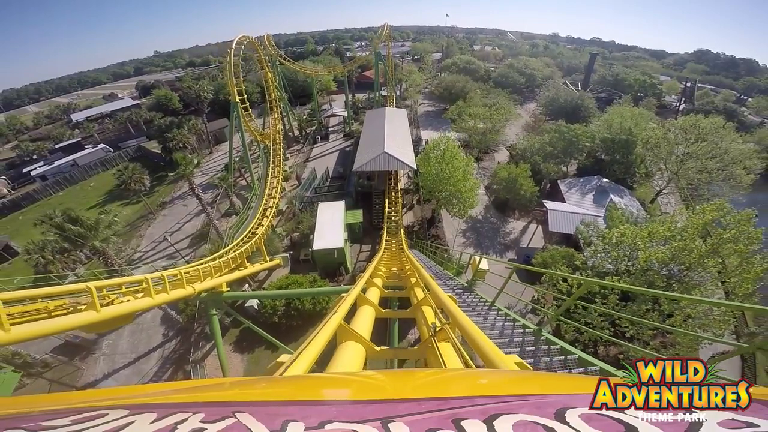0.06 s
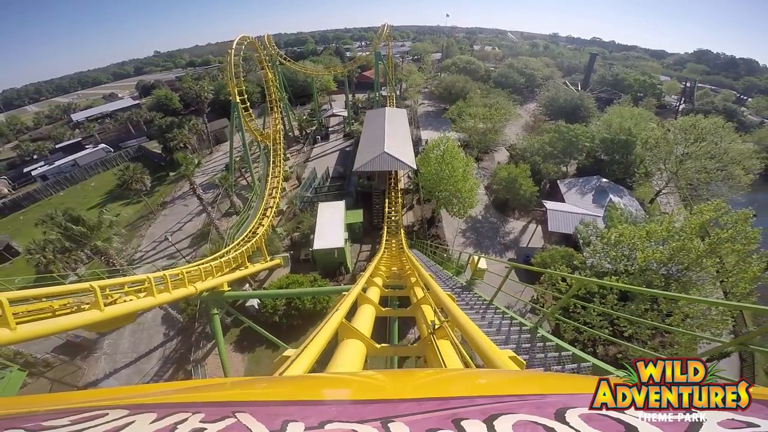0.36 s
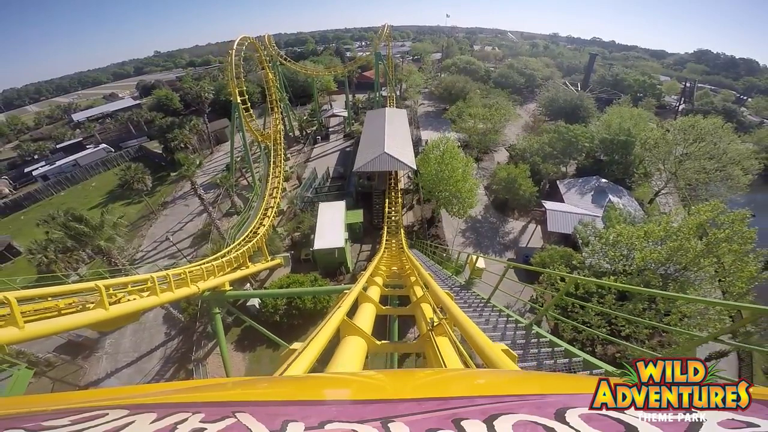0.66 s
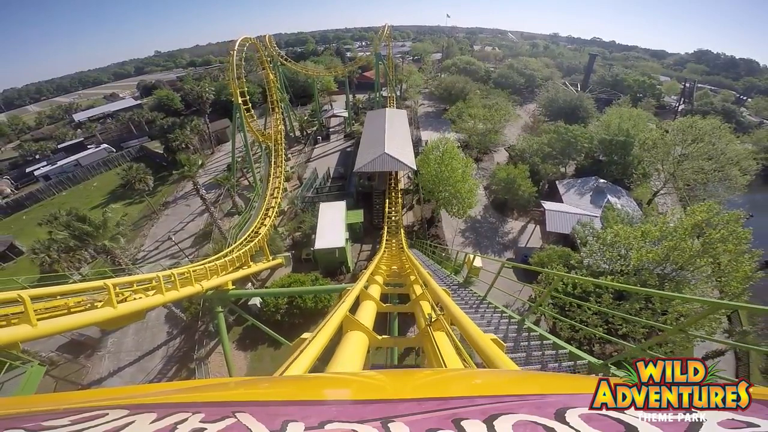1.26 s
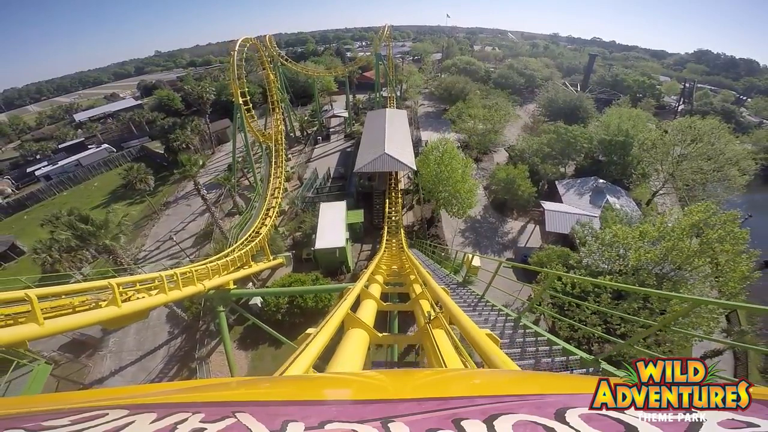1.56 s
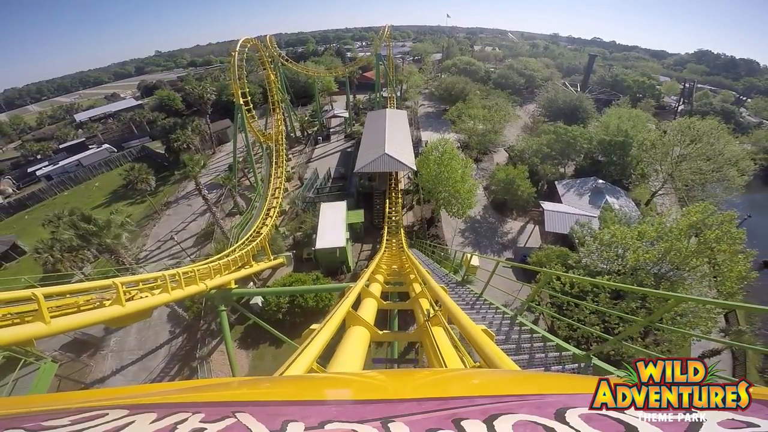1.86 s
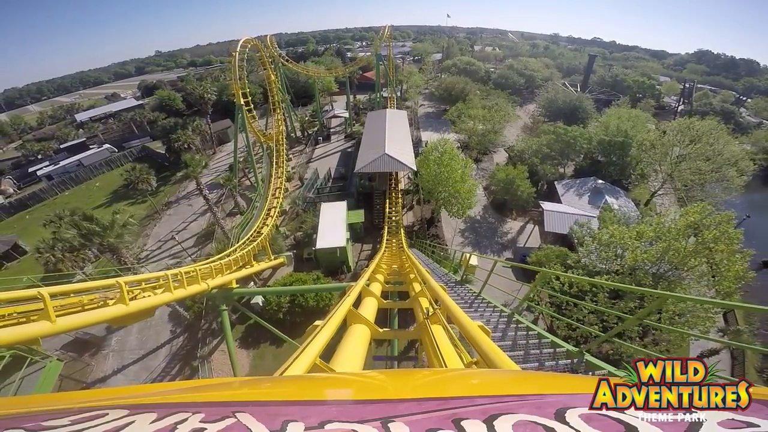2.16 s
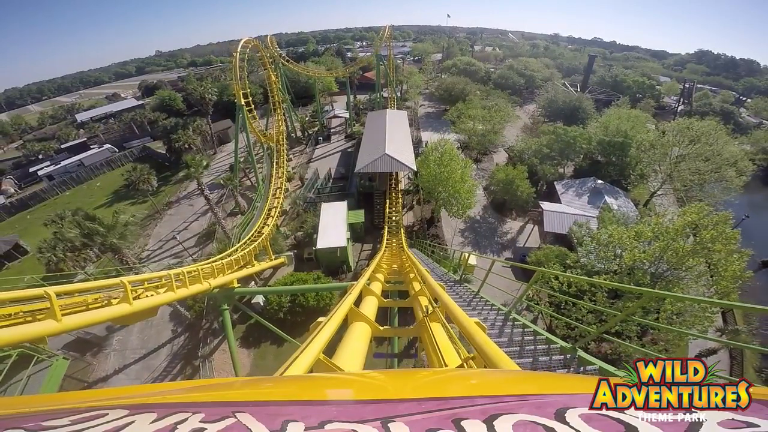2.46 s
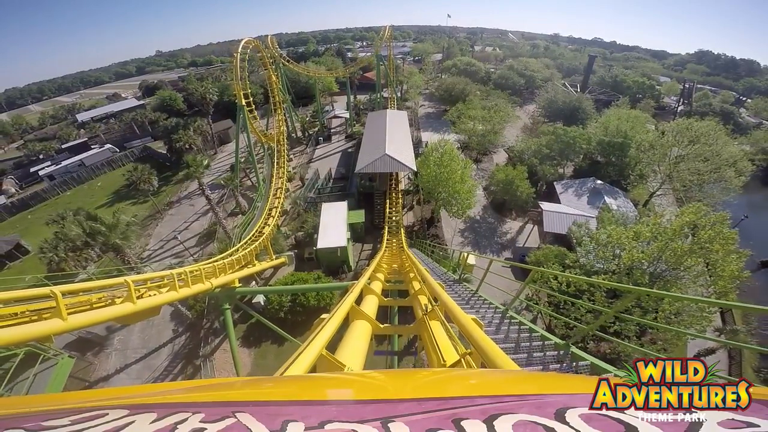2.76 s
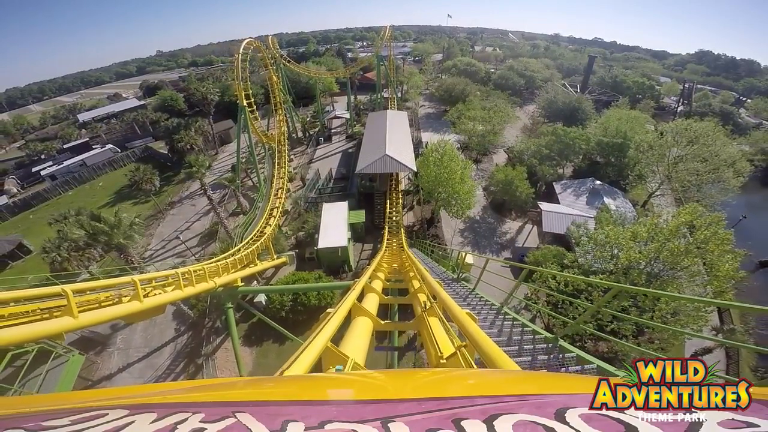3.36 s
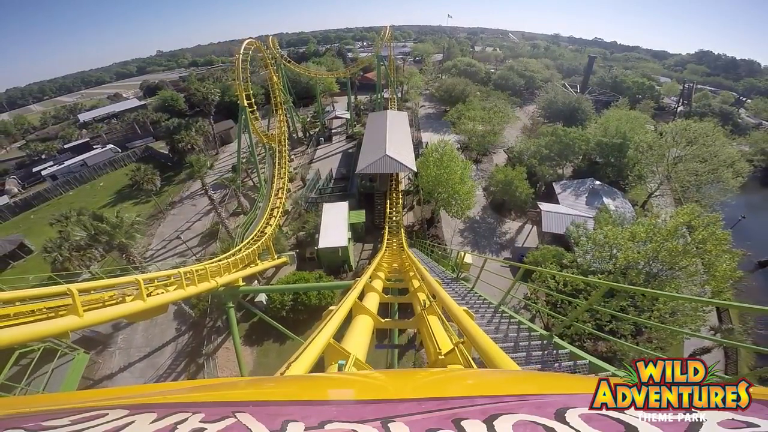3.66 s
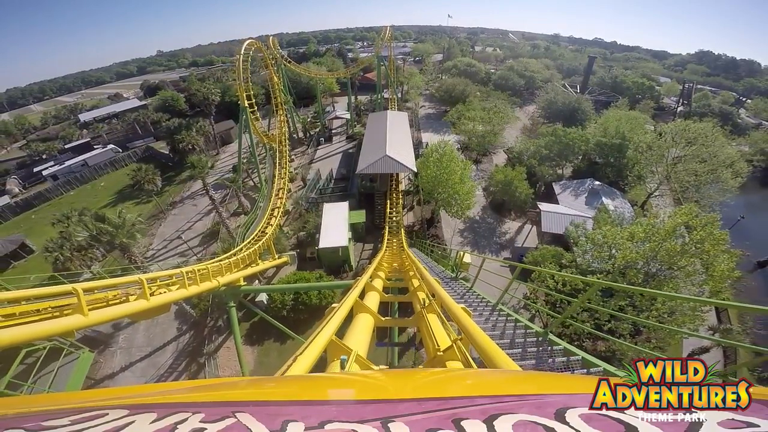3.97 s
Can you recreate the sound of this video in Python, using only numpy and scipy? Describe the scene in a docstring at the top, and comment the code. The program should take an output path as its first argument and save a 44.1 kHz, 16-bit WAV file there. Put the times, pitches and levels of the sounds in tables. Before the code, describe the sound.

A roller coaster car climbs the lift with a deep, shuddering rumble that swells and dips unevenly for the whole four seconds. Beneath it run a faint steady motor whine, light wind hiss and soft chain knocks, about ten a second. A wheel squeaks very faintly near 0.1 and 0.7 seconds, the hiss swells slightly around 0.4 seconds, and a brief faint tone falls at about one second.

```python
"""Roller coaster lift hill, front car, train creeping up.
The car shudders at its lowest resonance; its panels boom and drone as the wheels roll.
The lift drive whines on one steady pitch, beside faint wavering tones, over rolling and wind hiss.
Chain links seat with soft, evenly spaced knocks. A wheel squeaks faintly twice; one short tone falls."""
import sys
import numpy as np
from scipy import signal
from scipy.fft import rfft, irfft
from scipy.io import wavfile
from scipy.ndimage import uniform_filter1d

SR = 44100
rng = np.random.default_rng(int(sys.argv[2]) if len(sys.argv) > 2 else 0)


def dump_mix(stems):
    """Bounce the given channels to the path in sys.argv[1] as a 16-bit WAV at rate SR."""
    frames = np.atleast_2d(stems).T  # one column per channel
    limited = np.clip(frames, -1, 1)  # hard clip at full scale
    pcm = np.round(limited * 32767).astype(np.int16)
    wavfile.write(sys.argv[1], SR, pcm)


N = 176400
T = np.arange(N) / SR

# lowest car resonance, swelling and stalling: t/s, relative level/dB
SHUDDER_DB = [(0.02, -19.5), (0.06, -23.5), (0.15, -16), (0.29, -21), (0.33, -33.5), (0.49, -22.5),
              (0.6, -35), (0.71, -22), (0.76, -33.5), (0.8, -23), (0.88, -18.5), (0.96, -31), (1.18, -17),
              (1.31, -20.5), (1.38, -40), (1.5, -16), (1.56, -18.5), (1.6, -26), (1.7, -16), (1.75, -27),
              (1.81, -17.5), (1.91, -36), (1.95, -21), (2.04, -27.5), (2.15, -21), (2.57, -26.5),
              (2.59, -34), (2.7, -19.5), (2.81, -33), (2.88, -18.5), (3.04, -35.5), (3.11, -26.5),
              (3.73, -24), (3.86, -19), (3.95, -23.5), (3.98, -35.5)]
# its pitch: t/s, f/Hz
SHUDDER_HZ = [(0.02, 35), (0.05, 32.5), (0.13, 31.74), (1.34, 31.63), (1.44, 33.07), (2.79, 32.96),
              (2.96, 34.3), (3.04, 37.7), (3.07, 36.8), (3.98, 37.0)]
# panel boom: t/s, relative level/dB
BOOM_DB = [(0.02, -27), (0.25, -33.5), (0.27, -37), (0.66, -24), (0.72, -28.5), (1.83, -34), (1.94, -33.5),
           (2.02, -37.5), (2.07, -27), (2.17, -37.5), (2.25, -30), (2.28, -39.5), (2.42, -30), (2.75, -38),
           (3.56, -29.5), (3.69, -38), (3.75, -27.5), (3.98, -37)]
# panel drone: t/s, lower relative level/dB, upper relative level/dB
DRONE_DB = [(0.02, -37.5, -35.5), (0.2, -55, -42), (0.23, -31, -38), (0.37, -41.5, -42.5), (0.48, -40, -38),
            (0.52, -37, -43), (0.85, -46, -35.5), (0.96, -41, -47), (0.99, -43, -36), (1.17, -49.5, -44),
            (1.51, -36, -42), (2.21, -43, -41.5), (2.66, -40, -48.5), (2.7, -44, -35), (2.74, -52, -51.5),
            (2.85, -41.5, -43), (3.91, -43.5, -44), (3.98, -40, -45)]
# panel resonances, three sets: f/Hz, width/Hz, relative level/dB
BOOM_MODES = [(50.2, 14, -3), (63.46, 7.7, 3), (87.4, 5.9, -7)]
LOWER_DRONE_MODES = [(111.9, 5.5, -2), (135.9, 11.5, 0)]
UPPER_DRONE_MODES = [(153, 10.6, 0.5), (167, 14.2, -1.5), (203, 11, -12.5), (229.8, 3.7, -16.5)]

# strong drive partials: order, trim/dB
STRONG_ORDERS = [(2, 2), (4, 4.1), (6, 3.5), (7, 4.4), (10, -0.1)]
# their fades, before trim: t/s, level/dB for each order in the name
ORDERS_2_4_6_DB = [(0.05, -75, -66, -73), (0.41, -70, -59, -68), (0.43, -73, -59.5, -64),
                   (0.54, -68, -62, -75), (0.64, -79, -59, -70), (0.76, -68, -59, -71),
                   (1.27, -68.5, -61, -68.5), (1.59, -63.5, -59.5, -64.5), (1.7, -65, -59.5, -70),
                   (2.31, -64, -57.5, -65.5), (3.37, -74, -61.5, -78), (3.66, -62, -63.5, -74),
                   (3.75, -71, -65, -81), (3.95, -68, -64.5, -68)]
ORDER_7_DB = [(0.05, -67), (0.08, -62.5), (0.33, -73), (1.1, -65.5), (1.12, -70), (2.41, -70.5),
              (2.47, -76), (2.59, -67.5), (2.79, -79), (3.09, -63), (3.23, -69.5), (3.71, -65.5),
              (3.83, -62.5), (3.95, -66)]
ORDER_10_DB = [(0.05, -74), (0.24, -65), (0.54, -62.5), (0.58, -70.5), (1.74, -60.5), (1.78, -75),
               (1.87, -59), (2.46, -60.5), (2.56, -55), (2.61, -62.5), (3.08, -58.5), (3.15, -65),
               (3.79, -69), (3.86, -57), (3.89, -70), (3.95, -64)]
# weak drive partials: order, level/dB
WEAK_ORDERS = [(3, -70), (5, -77), (8, -70), (9, -76), (11, -77), (12, -79), (13, -72), (14, -78),
               (15, -83), (16, -81), (17, -82), (18, -84), (19, -86), (20, -86)]
# tones beside the whine: f/Hz, width/Hz, relative level/dB
SIDE_TONES = [(459, 3, -1), (629, 4, -2), (689, 2, 0), (863, 2, 0), (2296, 2, -3)]

# rolling and wind spectrum: f/Hz, relative density/dB
HISS_SPECTRUM = [(200, 3), (300, -2), (450, -4), (700, -7), (1100, -6.5), (1400, -8), (1750, -7.5),
                 (2000, -11), (2400, -7), (3050, -13.5), (4200, -14.5), (4750, -15.5), (5300, -22.5),
                 (6900, -23), (8000, -27), (11000, -30.5), (13000, -30), (14500, -30.5)]
# narrow hiss resonances: f/Hz, width/Hz, relative level/dB
HISS_MODES = [(594, 24, -5), (2607, 250, 1), (3175, 56, -9), (3520, 160, -8.5), (3895, 143, -6),
              (5870, 420, -17), (9540, 380, -23), (13700, 400, -22)]
# their joint envelope: t/s, level/dB
HISS_RING_DB = [(0, -56), (.8, -60.5), (1.5, -62), (2.3, -61), (3.1, -59.5), (4, -61.5)]
# early mid-band swell: t/s, level/dB
HISS_MID_DB = [(0, -65), (.28, -67), (.42, -55.5), (.7, -60.5), (1.0, -61), (1.2, -67), (4, -84)]

# resonances struck by a link: f/Hz, relative level/dB, t60/s
KNOCK_MODES = [(142, -15, 0.029), (267, 0, 0.025), (364, -3, 0.02)]
# wheel squeaks: t/s, length/s, f/Hz, level/dB
SQUEAKS = [(.08, .11, 6640, -72), (0.712, 0.085, 6640, -72)]


def from_db(db):
    """Decibels to gain."""
    return 10 ** (np.asarray(db) / 20)


def curves(rows):
    """Each column after t/s, interpolated per sample."""
    times_s, *columns = np.transpose(rows)
    return [np.interp(T, times_s, column) for column in columns]


def swell(start_s, length_s):
    """Rounded rise and fall."""
    progress = np.clip((T - start_s) / length_s, 0, 1)
    return np.sqrt(np.abs(np.sin(np.pi * progress)))


def noise(shape):
    """Unit-rms noise with amplitude spectrum shape(hz)."""
    hz = np.maximum(np.arange(N // 2 + 1) * SR / N, 1e-3)
    x = irfft(rfft(rng.standard_normal(N)) * shape(hz), N)
    return x / np.sqrt(np.mean(x ** 2) + 1e-20)


def drift(rate_hz):
    """Slow unit-rms wander."""
    return noise(lambda hz: 1 / (1 + (hz / rate_hz) ** 4))


def resonant_noise(modes):
    """Random forcing through steep-sided resonances, unit rms."""
    def shape(hz):
        power = 0
        for centre_hz, width_hz, db in modes:
            detuning = (hz - centre_hz ** 2 / hz) / (np.sqrt(2) * width_hz)
            power += from_db(db) ** 2 / width_hz / (1 + detuning ** 2) ** 2
        return np.sqrt(power)
    return noise(shape)


def car_shudder(wander_hz=1.497, trim_db=1):
    """The car's lowest resonance: a deep sine of unsteady pitch."""
    (level_db,), (pitch_hz,) = curves(SHUDDER_DB), curves(SHUDDER_HZ)
    cycles = np.cumsum(pitch_hz + wander_hz * drift(rate_hz=6.86)) / SR
    return np.sqrt(2) * from_db(level_db + trim_db) * np.sin(2 * np.pi * cycles)


def panel(modes, level_db, trim_db, window_s):
    """Randomly forced panel, its own swells evened out before the envelope."""
    vibration = resonant_noise(modes)
    local_rms = np.sqrt(uniform_filter1d(vibration ** 2, int(window_s * SR)) + 1e-9)
    return from_db(level_db + trim_db) * vibration / local_rms


def car_panels():
    """Rolling wheels drive a low boom and two drones."""
    (boom_db,), (lower_db, upper_db) = curves(BOOM_DB), curves(DRONE_DB)
    boom = panel(BOOM_MODES, boom_db, trim_db=1, window_s=0.15)
    lower = panel(LOWER_DRONE_MODES, lower_db, trim_db=1.5, window_s=0.14)
    upper = panel(UPPER_DRONE_MODES, upper_db, trim_db=0.5, window_s=0.09)
    return boom + lower + upper


def lift_drive(base_hz=269.2, wander_hz=0.098, flutter_db=0.4, weak_fade_db=2.0):
    """Partials locked to one steady shaft speed, each fading on its own."""
    cycles = np.cumsum(base_hz + wander_hz * drift(rate_hz=3.3)) / SR
    fades_db = curves(ORDERS_2_4_6_DB) + curves(ORDER_7_DB) + curves(ORDER_10_DB)
    strong = [(order, db + trim_db + flutter_db * drift(rate_hz=18))
              for (order, trim_db), db in zip(STRONG_ORDERS, fades_db)]
    weak = [(order, db + weak_fade_db * drift(rate_hz=2.3)) for order, db in WEAK_ORDERS]
    return sum(np.sqrt(2) * from_db(db) * np.sin(2 * np.pi * (order * cycles + rng.random()))
               for order, db in strong + weak)


def side_tones(level_db=-69):
    """Noise bands narrow enough to waver as faint tones."""
    return from_db(level_db) * resonant_noise(SIDE_TONES)


def hiss(broad_db=-52, mid_hz=890, mid_width_hz=970):
    """Rolling and wind noise with ringing bands and a mid-band swell."""
    points_hz, density_db = np.transpose(HISS_SPECTRUM)
    (ring_db,), (mid_db,) = curves(HISS_RING_DB), curves(HISS_MID_DB)
    broad = noise(lambda hz: from_db(np.interp(np.log(hz), np.log(points_hz), density_db)))
    mid = resonant_noise([(mid_hz, mid_width_hz, 0)])
    ringing = resonant_noise(HISS_MODES)
    return from_db(broad_db) * broad + from_db(mid_db) * mid + from_db(ring_db) * ringing


def ring(clicks, hz, t60_s):
    """Damped mode: a unit click starts a sine of height 1."""
    decay = from_db(-60 / (t60_s * SR))
    step_rad = 2 * np.pi * hz / SR
    return signal.lfilter([0, np.sin(step_rad)], [1, -2 * decay * np.cos(step_rad), decay ** 2], clicks)


def chain(first_s=0.0338, period_s=0.10239, click_db=-40, spread_db=0.8, lowpass_hz=554):
    """Links seat in turn; each softened click rings as a dull knock."""
    times_s = np.arange(first_s, N / SR, period_s)
    clicks = np.zeros(N)
    clicks[(times_s * SR).astype(int)] = from_db(click_db + spread_db * rng.standard_normal(len(times_s)))
    softened = signal.sosfilt(signal.butter(2, lowpass_hz, fs=SR, output="sos"), clicks + 1e-18)
    return sum(from_db(db) * ring(softened, hz, t60_s) for hz, db, t60_s in KNOCK_MODES)


def wheel_squeaks(width_hz=300, octave_db=-9):
    """Short, thin rubs: a noise band plus its octave."""
    rubs = np.zeros(N)
    for start_s, length_s, hz, db in SQUEAKS:
        bands = [(hz, width_hz, 0), (2 * hz, width_hz, octave_db)]
        rubs += from_db(db) * swell(start_s, length_s) * resonant_noise(bands)
    return rubs


def falling_tone(start_s=0.92, length_s=0.13, from_hz=1055, to_hz=1000, peak_db=-60):
    """One faint sine sliding down."""
    hz = np.interp(T, [start_s, start_s + length_s], [from_hz, to_hz])
    return from_db(peak_db) * swell(start_s, length_s) * np.sin(2 * np.pi * np.cumsum(hz) / SR)


def scene():
    """Mono sum at the front car."""
    continuous = car_shudder() + car_panels() + lift_drive() + side_tones() + hiss()
    return (continuous + chain() + wheel_squeaks() + falling_tone())[None]


def record(dry):
    """Steep elliptic low-pass."""
    cutoff_hz = 14800
    return signal.sosfilt(signal.ellip(10, 0.1, 80, cutoff_hz, fs=SR, output="sos"), dry)


dry = scene()
out = record(dry)
dump_mix(out)
```